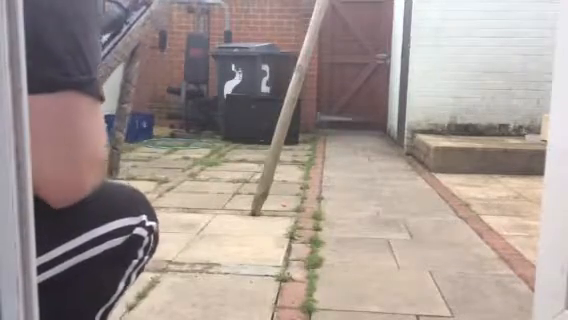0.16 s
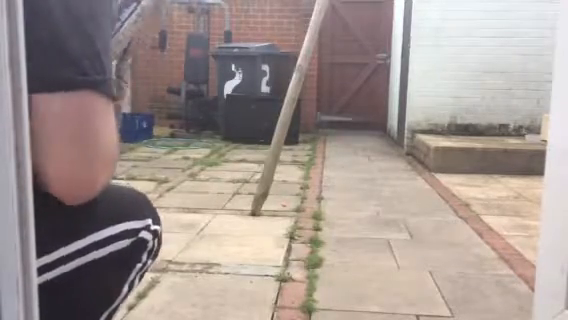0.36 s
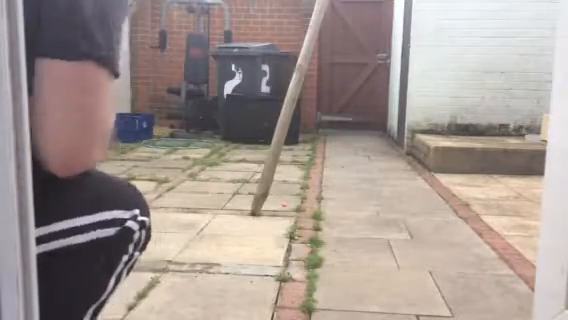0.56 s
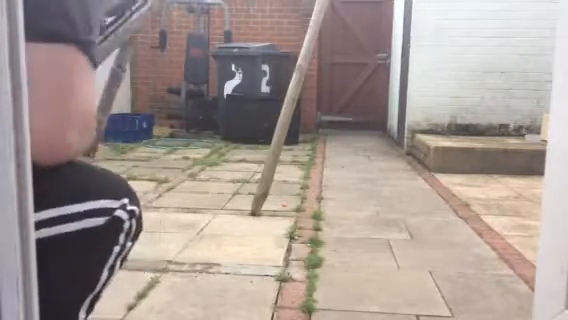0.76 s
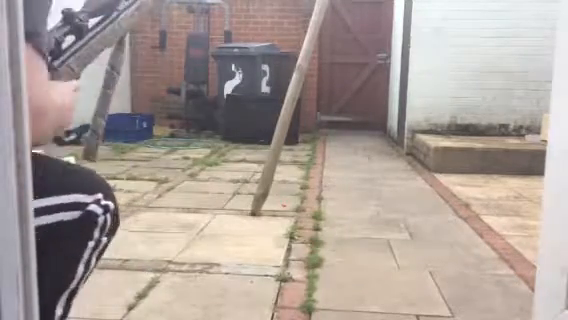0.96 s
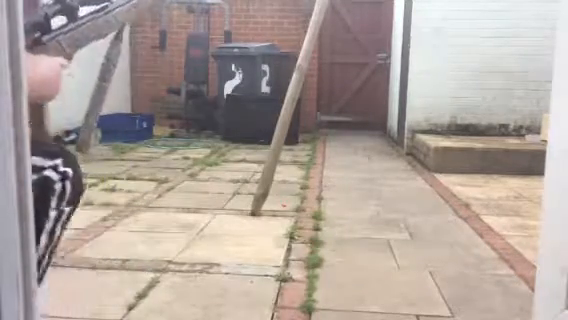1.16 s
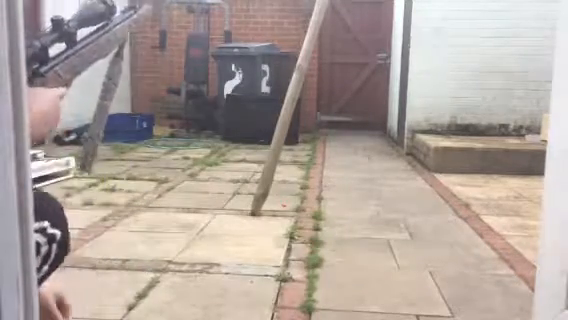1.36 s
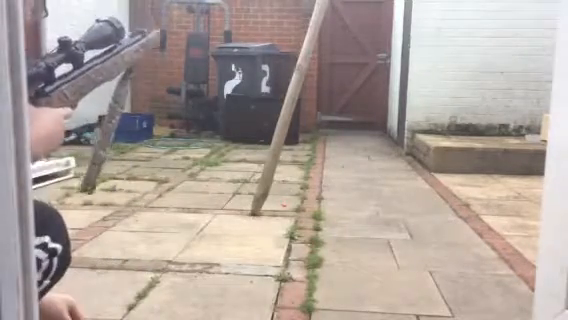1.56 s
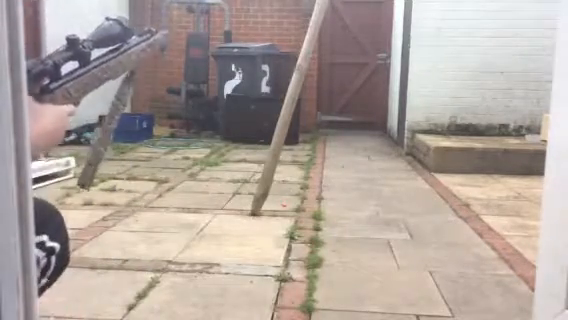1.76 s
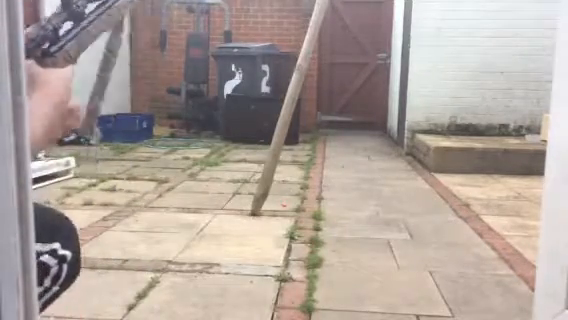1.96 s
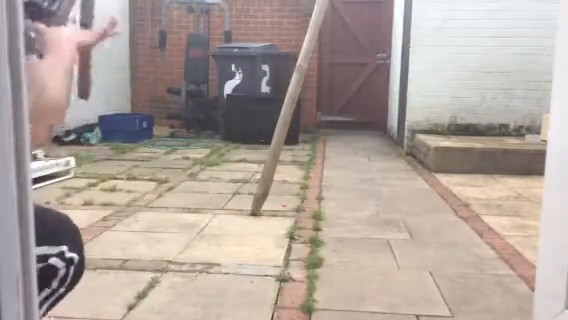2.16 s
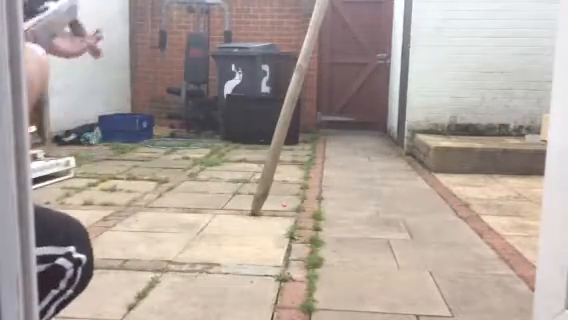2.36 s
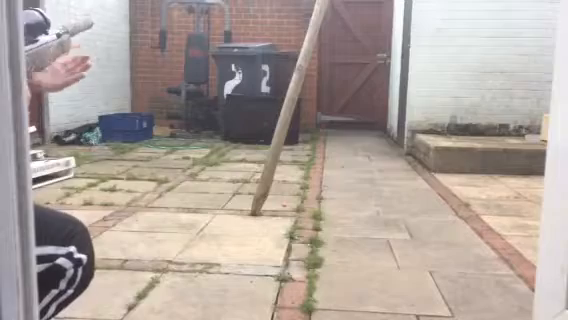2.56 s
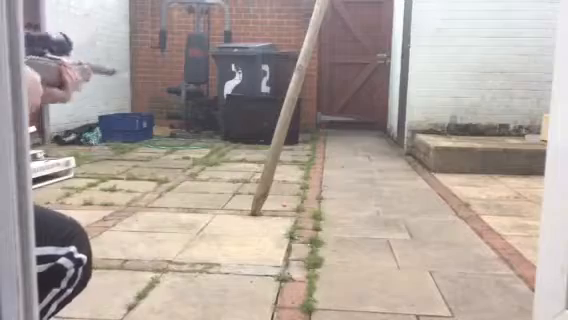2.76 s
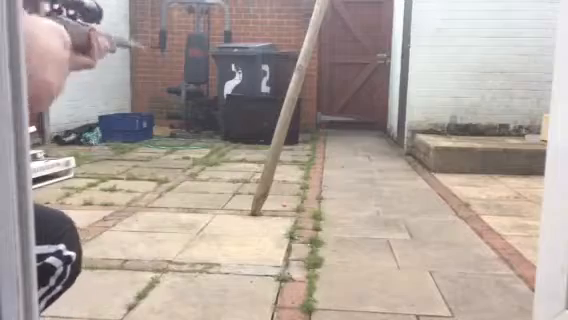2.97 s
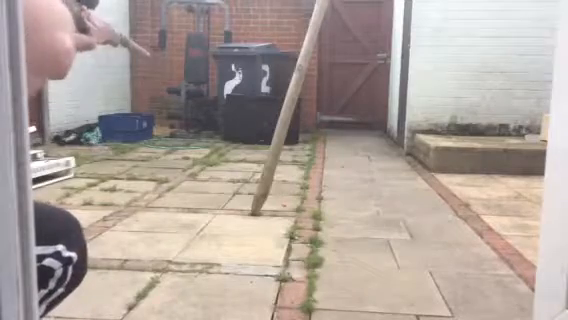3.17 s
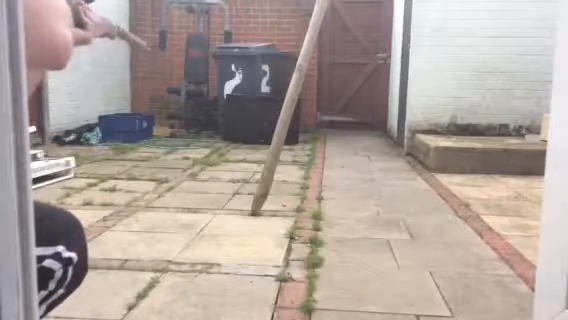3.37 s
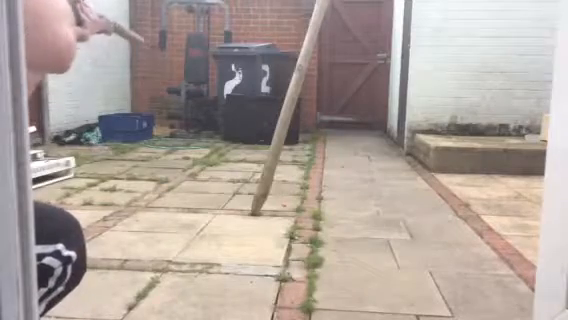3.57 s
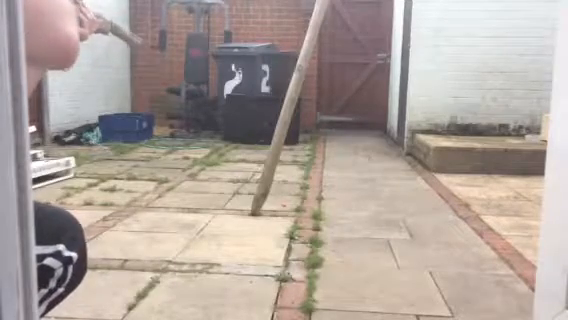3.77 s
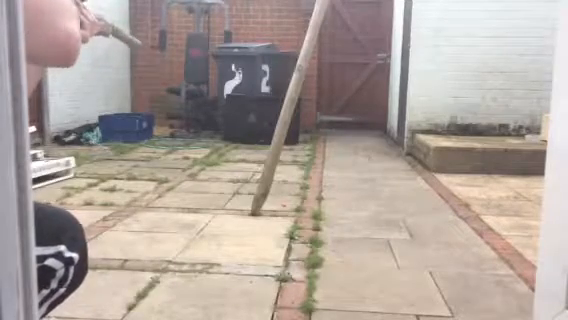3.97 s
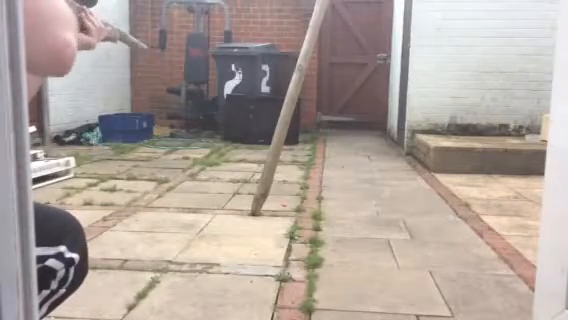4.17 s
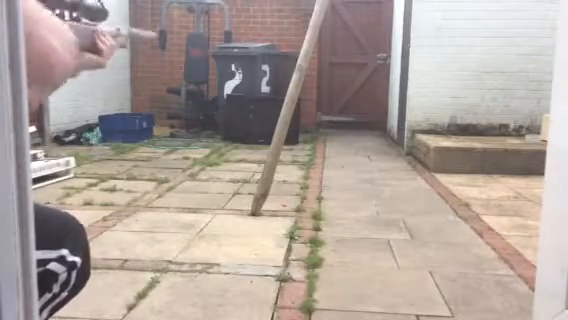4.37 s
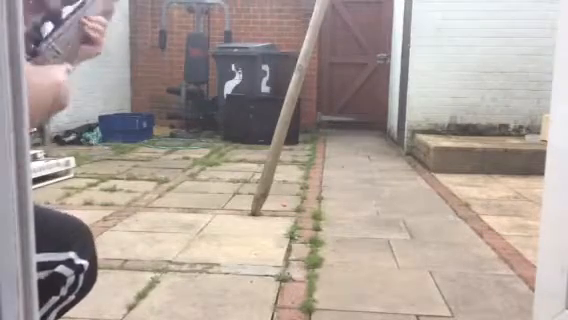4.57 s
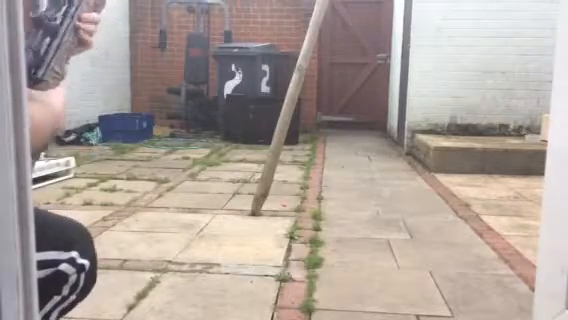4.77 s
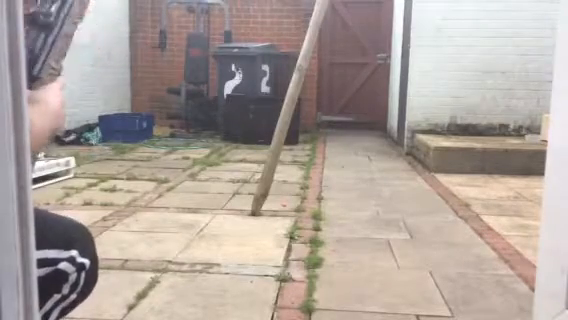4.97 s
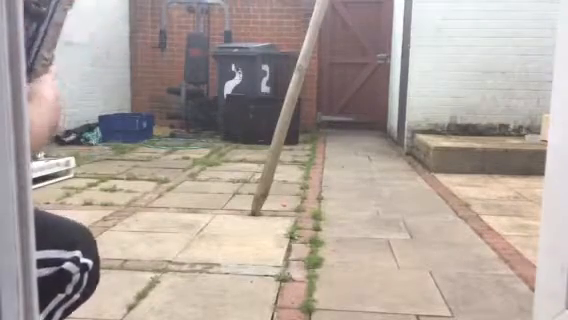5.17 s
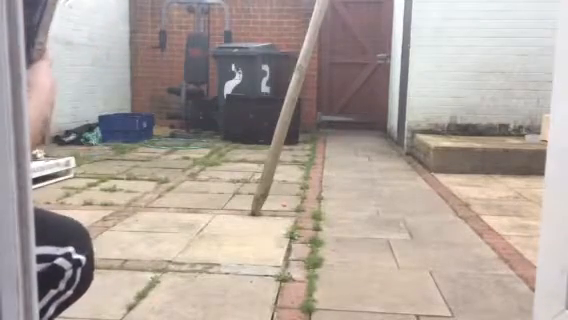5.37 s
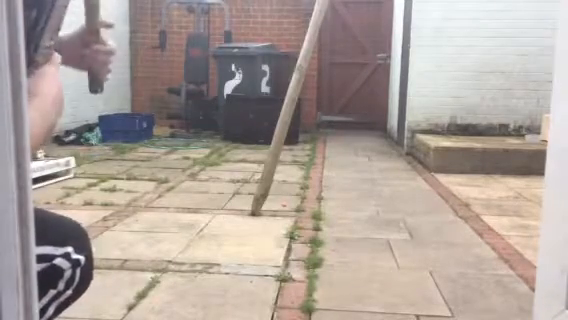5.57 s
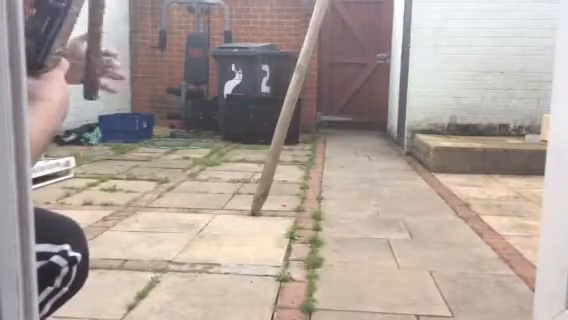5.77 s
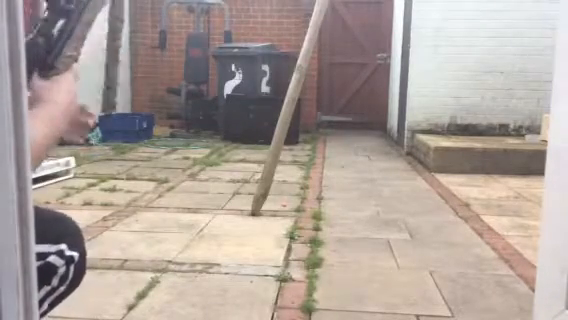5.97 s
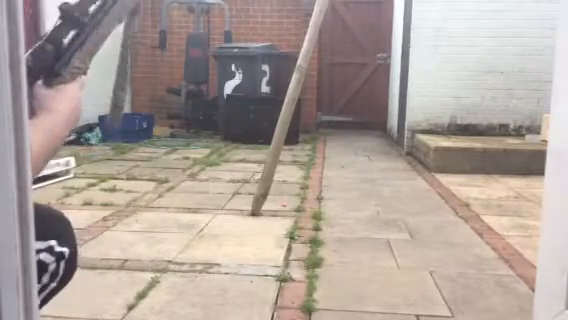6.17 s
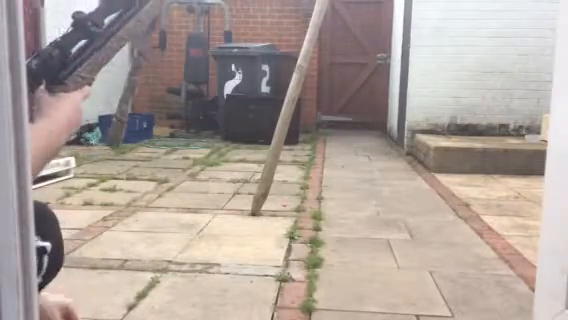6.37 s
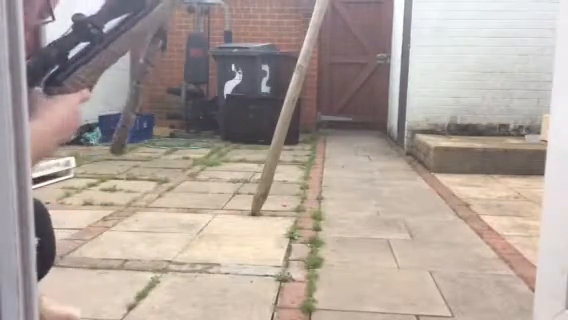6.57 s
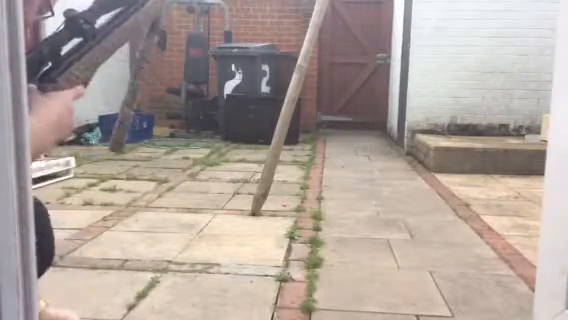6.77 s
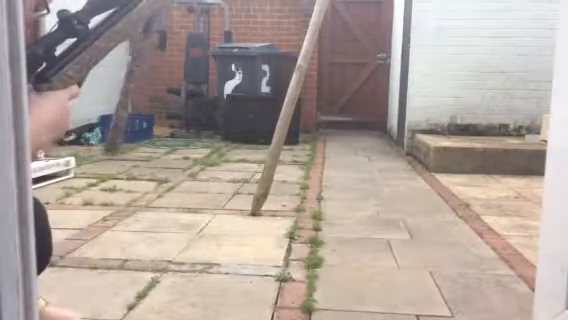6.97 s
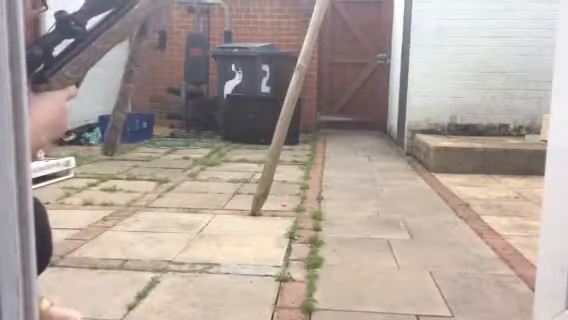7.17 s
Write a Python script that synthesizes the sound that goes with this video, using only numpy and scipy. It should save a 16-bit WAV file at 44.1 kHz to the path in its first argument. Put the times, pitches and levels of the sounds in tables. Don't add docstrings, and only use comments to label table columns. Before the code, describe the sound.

In a small paved yard with brick walls, faint distant traffic and microphone hiss lie under light steel clicks and wooden knocks. After a cluster of handling noises and a pause, a spring air rifle cracks once, its spring buzzing and the pellet smacking a panel, with short wall slaps. Then clicks, sleeve rubs and a bright ringing cocking catch follow, ending in tiny ticks. Close handling, small phone-like microphone.

```python
import sys
import numpy as np
from scipy import signal
from scipy.fft import rfft, irfft, next_fast_len
from scipy.io import wavfile

SR = 44100
rng = np.random.default_rng(int(sys.argv[2]) if len(sys.argv) > 2 else 0)


def voltage_ratio(decibels):
    exponent = np.asarray(decibels, float) / 20
    return 10 ** exponent


def file_out(sig):
    cols = np.atleast_2d(sig).T
    lim = np.clip(cols, -1, 1)
    pcm = np.round(lim * 32767).astype(np.int16)
    wavfile.write(sys.argv[1], SR, pcm)


N = 318490

# start_s, level_db
ENGINES = [(0, -49), (.9, -48), (1.75, -46.5), (2.4, -49.5), (3.1, -53), (3.9, -49.5), (4.7, -48.5),
           (5.4, -52), (6.7, -52.5), (7.22, -50)]
# start_s, level_db
TYRES = [(0, -55), (.4, -55.5), (.9, -52.5), (1.4, -53.5), (2.5, -52.5), (3.4, -54.5), (3.9, -53),
         (4.7, -55.5), (5.3, -57.5), (6.3, -59), (7.22, -58.5)]
# frequency_hz, density_db (per Hz)
RUMBLE_SPECTRUM = [(15, -55.5), (25, -31), (52, -9), (70, 2.5), (85, 2), (102, -10), (124, -7), (162, -10),
                   (244, -25.5), (300, -23), (390, -57), (660, -120)]
ROAR_SPECTRUM = [(120, -28), (200, 2), (254, -7), (312, -6), (405, -8.5), (452, -5), (862, -6), (1430, -10),
                 (2530, -31), (3500, -38.5), (4550, -66), (7700, -120)]
HISS_SPECTRUM = [(1470, -29.5), (2500, -6.5), (3220, 4), (4080, -2.5), (4470, -0.5), (6740, -4),
                 (8290, -0.5), (9150, -0.5), (13900, -17), (15500, -26)]
# frequency_hz, t60_s
YARD_T60 = [(100, .45), (400, .3), (1500, 0.33), (5000, .28), (10000, .26), (12500, .12)]
# delay_s, level_db
WALL_ECHOES = [
    (.018, -14),
    (.037, -17),
]
# full_rub_s, swell_s, dull_db, bright_db (relative to dull)
RUBS = [(2.45, .07, -65, -8), (2.51, .06, -64, -10), (2.57, .07, -61, -9), (4.79, .01, -59, -11),
        (5.36, .02, -65, -6), (5.41, .04, -66, -5), (5.46, .04, -66, -6), (5.711, .02, -69, 11),
        (5.74, .04, -69, 8), (5.78, .01, -70, 14), (6.18, .08, -71, -11), (6.72, .06, -78, -1),
        (6.8, .08, -69, -5), (7.09, .04, -68, -3), (7.13, .05, -73, 0)]
# start_s, level_db
BUTT_THUMPS = [
    (0.857, -38),
    (1.401, -47),
    (2.203, -40),
]
# pitch_hz, level_db, t60_s
BUTT_MODES = [(120, 0, .06), (190, -2, .05)]
LATCH_HZ = [1300, 1500, 1750, 1950, 2150]
CLACK_HZ = [2400, 2850, 3250, 3650, 4100, 4700]
# start_s, stock_pitch_hz, stock_db, latch_db
KNOCKS = [(0.7214, 880, -49, -52), (0.8554, 470, -32, -37), (0.8595, 520, -28, -33),
          (1.2894, 587, -50, -60), (1.4004, 520, -34, -51), (2.2020, 620, -23, -40),
          (2.2124, 600, -34, -55), (2.5604, 480, -33, -38), (3.7454, 592, -48, -56),
          (5.8834, 869, -44, -43), (6.1794, 805, -54, -60)]
# start_s, latch_db, tick_db, struck_region_hz
CLICKS = [(0.7014, -55, -74, 2400), (1.4287, -49, -61, 2300), (1.6965, -53, -58, 2400),
          (2.1174, -58, -62, 2400), (2.4234, -60, -70, 2400), (2.4493, -44, -56, 2100),
          (2.5072, -35, -50, 1700), (2.5481, -38, -42, 1800), (2.5664, -36, -50, 1600),
          (3.4385, -46, -53, 2800), (4.7812, -32, -48, 2600), (5.3472, -44, -53, 2800),
          (5.3772, -41, -50, 2200), (5.4106, -49, -55, 2200), (5.454, -42, -53, 1900),
          (5.7259, -41, -36, 1700), (5.7683, -40, -28, 1700), (6.7022, -60, -63, 2000),
          (6.7734, -54, -65, 2400), (6.7989, -42, -57, 1850), (6.9114, -62, -63, 2400),
          (6.977, -48, -65, 1750), (7.0773, -52, -63, 2200), (7.0924, -47, -59, 1900),
          (7.1094, -60, -56, 2000)]
# start_s, level_db
SEAR_CATCH = [
    (5.709, -16),
    (5.728, -15.5),
    (5.769, -11),
]
# pitch_hz, level_db, t60_s
COCKING_MODES = [(5525, -27.5, 0.16), (8070, -5.5, 0.17), (8800, -8, 0.14), (9211, -7, 0.17),
                 (9550, -14, 0.14), (10650, -25.5, 0.11), (12500, -22, 0.15)]
# start_s, level_db
SPRING = [(3.962, -70), (3.974, -45.5), (3.980, -29.5), (4.0, -24.5), (4.03, -27.5), (4.06, -35),
          (4.1, -69)]
# frequency_hz, density_db (per Hz)
SPRING_SPECTRUM = [(180, -28.5), (300, 1), (2070, 0.5), (3440, -2), (6000, -10.5), (6730, -11.5),
                   (7670, -4), (10000, -8), (11600, -30)]
# pitch_hz, level_db, t60_s
PANEL_MODES = [(123.5, -35, .13), (175, -33, .13), (230, -42, .08), (430, -30, .1), (560, -30, .08),
               (760, -29, .06)]
# start_s, stock_pitch_hz, stock_db, latch_db, tick_db
SHOT = [
    (3.9840, 560, -16, -28, -28),
    (3.9888, 660, -7, -15, -6),
    (4.0055, 600, -9, -13, -18),
    (4.0130, 750, -18, -20, -24),
    (4.0245, 740, -5, -9, -20),
    (4.0435, 560, -15, -19, -27),
]


def rms_one(x):
    return x / np.sqrt(np.mean(x ** 2) + 1e-20)


def in_time(rows):
    s, level = np.transpose(rows)
    return np.interp(np.arange(N) / SR, s, level)


def at_hz(points, hz):
    table_hz, value = np.transpose(points)
    return np.interp(np.log(hz), np.log(table_hz), value)


def band(x, low_hz, high_hz, order=2):
    return signal.sosfilt(signal.butter(order, [low_hz, high_hz], "band", fs=SR, output="sos"), x)


def drift(rate):
    r = np.exp(-80 * np.pi * rate / SR)
    white = rng.standard_normal(N // 40 + 2002)
    slow = signal.lfilter([1], [1, -2 * r, r * r], white)[2000:]
    return np.interp(np.arange(N) / 40, np.arange(len(slow)), rms_one(slow))


def coloured(spectrum, patchy_db):
    size = next_fast_len(N)
    hz = np.clip(np.fft.rfftfreq(size, 1 / SR), 1, None)
    inside = (hz > spectrum[0][0]) & (hz < spectrum[-1][0])
    white = rfft(rng.standard_normal(size))
    noise = irfft(white * voltage_ratio(at_hz(spectrum, hz)) * inside, size)[:N]
    return rms_one(noise * voltage_ratio(patchy_db * drift(5.5)))


def ring(force, hz, t60):
    r, w = voltage_ratio(-60 / (t60 * SR)), 2 * np.pi * hz / SR
    return signal.lfilter([0, np.sin(w)], [1, -2 * r * np.cos(w), r * r], force + 1e-18)


def add(track, s, sound):
    i = round(s * SR)
    track[i:i + len(sound)] += sound[:N - i]


def hiss():
    return voltage_ratio(-81) * coloured(HISS_SPECTRUM, patchy_db=1.1)


def traffic():
    duck_db = in_time([(3.96, 0), (4.18, -13), (4.66, 0)])
    rumble = voltage_ratio(in_time(ENGINES) + duck_db) * coloured(RUMBLE_SPECTRUM, patchy_db=-0.5)
    roar = voltage_ratio(in_time(TYRES)) * coloured(ROAR_SPECTRUM, patchy_db=0.9)
    return rumble + roar


def yard(x, wet_db, echo_db):
    t = np.arange(SR) / SR
    far = voltage_ratio(-33 - 60 * t / 1.0)
    edges = 90 * 2. ** np.arange(0, 7.6, .5)
    white, tail = rng.standard_normal((2, len(t))), 0
    for k, (low, high) in enumerate(zip(edges, edges[1:])):
        near = voltage_ratio(-60 * t / at_hz(YARD_T60, np.sqrt(low * high)))
        tail = tail + band(white[k % 2], low, high) * (near + far / np.sqrt(high / 2000))
    tail = tail * (1 - np.exp(-t / 0.0059))
    response = voltage_ratio(wet_db) * tail / np.sqrt(np.sum(tail ** 2))
    for s, level_db in WALL_ECHOES:
        scatter = rng.standard_normal(260) * np.hanning(260) / 11
        i = round(s * SR)
        response[i:i + 260] += voltage_ratio(level_db + echo_db) * scatter
    return signal.fftconvolve(x, response)[:N]


def slides():
    happens = rng.random((2, N)) < 3000 / SR
    slips = happens * voltage_ratio(3.0 * rng.exponential(1, N)) * np.sign(rng.standard_normal(N))
    dull = rms_one(band(slips[0], 1300, 4400))
    bright = rms_one(band(slips[1], 5800, 10000))
    out, t = np.zeros(N), np.arange(N) / SR
    edge_db, fade_s = -25, .075
    for s, swell_s, dull_db, bright_db in RUBS:
        away = np.maximum((s - t) / swell_s, (t - s) / fade_s)
        level = (away < 1) * voltage_ratio(dull_db + edge_db * np.minimum(away, 1))
        out += level * (dull + voltage_ratio(bright_db) * bright)
    return out


def struck(modes, hits):
    out, click, sound = np.zeros(N), signal.unit_impulse(SR // 2), 0
    for hz, level_db, t60 in modes:
        pair = ring(click, hz, t60) + .6 * ring(click, 1.03 * hz, t60)
        sound = sound + voltage_ratio(level_db) * pair
    for s, level_db in hits:
        add(out, s, voltage_ratio(level_db) * sound)
    return out


def contacts(rows, scuff_s, stock_t60, latch_t60, tick_t60, clack_over_db):
    out, t = np.zeros(N), np.arange(1800) / SR
    rough = rng.standard_normal((len(rows), 4, len(t)))
    push = (t / scuff_s) ** 2 * np.exp(-2 * t / scuff_s)
    for (s, stock_hz, stock_db, latch_db, tick_db, region_hz), grit in zip(rows, rough):
        knock = np.exp(-t / .0002) + .25 * push * grit[0]
        stock = ring(knock, stock_hz, stock_t60) + .6 * ring(knock, 1.5 * stock_hz, stock_t60)
        stock = band(stock, .65 * stock_hz, 1.9 * stock_hz)

        grip = 1 + .015 * grit[0, -1]
        latch, clack = 0, 0
        for k, hz in enumerate([*LATCH_HZ, *CLACK_HZ[:3]]):
            fall_db = -12 * abs(np.log2(hz / region_hz))
            latch = latch + ring(push * grit[1], grip * hz, latch_t60) * (-1) ** k * voltage_ratio(fall_db)
        latch = band(latch, .55 * region_hz, 1.3 * region_hz)

        for k, hz in enumerate(CLACK_HZ):
            uneven = (-.8) ** k * voltage_ratio(4.0 * grit[2, -1 - k])
            clack = clack + ring(push * grit[2], grip * hz, latch_t60) * uneven
        clack_db = (latch_db + tick_db) / 2 + clack_over_db

        tick = grit[3] * np.minimum(t / scuff_s, 1) * voltage_ratio(-60 * t / tick_t60)
        tick = band(tick, 5000, 10800)
        for part, level_db in ((stock, stock_db), (latch, latch_db), (clack, clack_db), (tick, tick_db)):
            add(out, s - .001, voltage_ratio(level_db) * part / np.abs(part).max())
    return out


def handling():
    rows = []
    for s, stock_hz, stock_db, latch_db in KNOCKS:
        rows.append((s, stock_hz, stock_db, latch_db, stock_db - 37, 1400))
    for s, latch_db, tick_db, region_hz in CLICKS:
        rows.append((s, 650, latch_db - 6, latch_db, tick_db, region_hz))
    hands = contacts(rows, scuff_s=.0021, stock_t60=.018, latch_t60=.009, tick_t60=.035, clack_over_db=0.6)
    cocking = voltage_ratio(-38) * struck(COCKING_MODES, SEAR_CATCH)
    return hands + cocking + slides() + struck(BUTT_MODES, BUTT_THUMPS)


def mainspring():
    level_db = in_time(SPRING)
    chatter = voltage_ratio(3.5 * rng.standard_normal(N // 40 + 1).repeat(40)[:N])
    noise = rms_one(coloured(SPRING_SPECTRUM, patchy_db=0.5) * chatter)
    return voltage_ratio(level_db) * (level_db > -69) * noise


def shot():
    rows = [(*row, 1800) for row in SHOT]
    impacts = contacts(rows, scuff_s=.0007, stock_t60=.018, latch_t60=.007, tick_t60=.012, clack_over_db=-4)
    return impacts + mainspring() + struck(PANEL_MODES, [(4.025, 0)])


def scene():
    hands, blast = handling(), shot()
    near = hands + yard(hands, wet_db=-9.5, echo_db=-6)
    near = near + blast + yard(blast, wet_db=-7.8, echo_db=-12.5)
    capsule = band(near, 100, 10900, order=6)
    return (capsule + traffic())[None]


def roll_off(x):
    return signal.sosfilt(signal.butter(12, 15820, fs=SR, output="sos"), x)


def record(dry):
    wired = dry + hiss()
    return roll_off(0.91 * np.tanh(wired / 0.89))


dry = scene()
out = record(dry)
file_out(out)
```